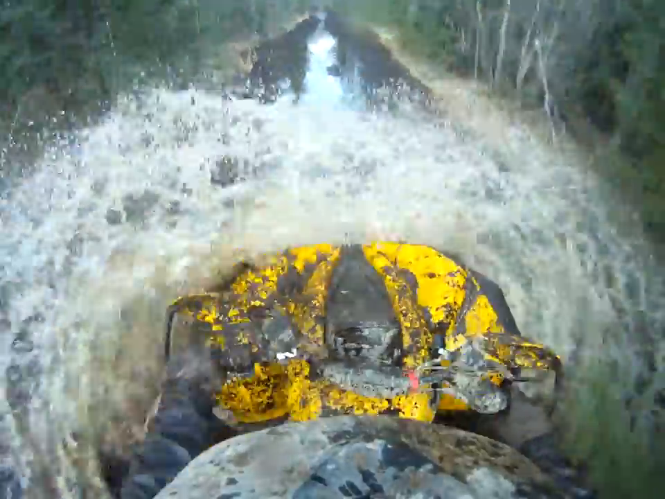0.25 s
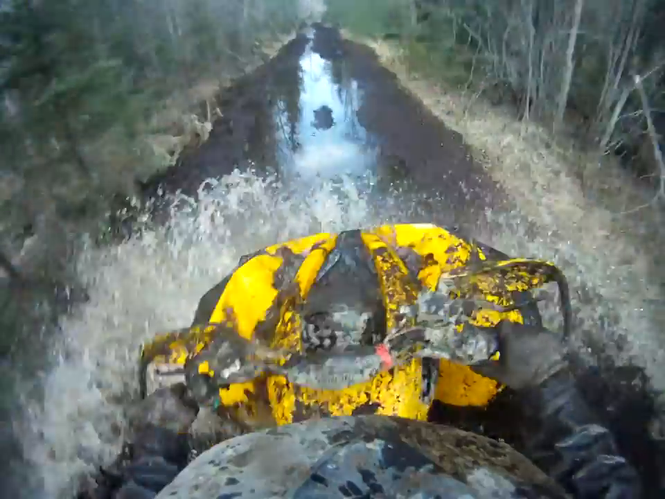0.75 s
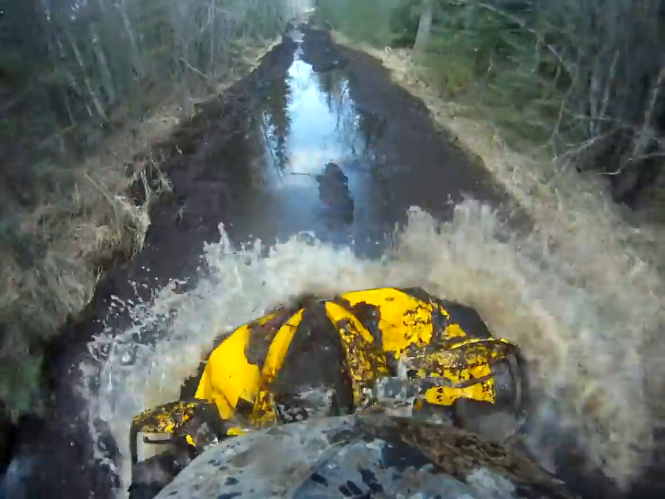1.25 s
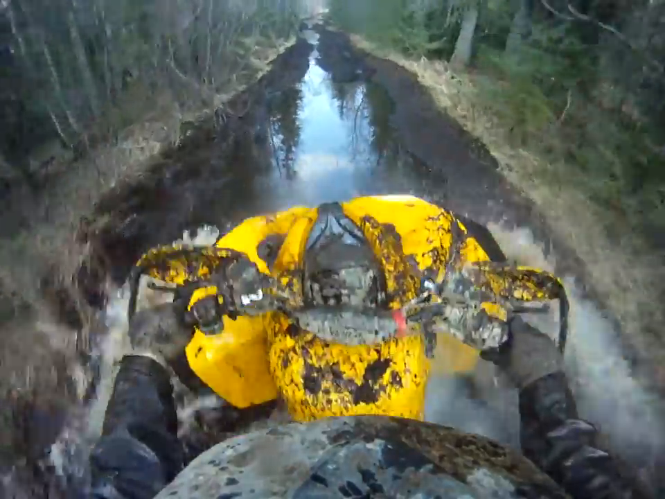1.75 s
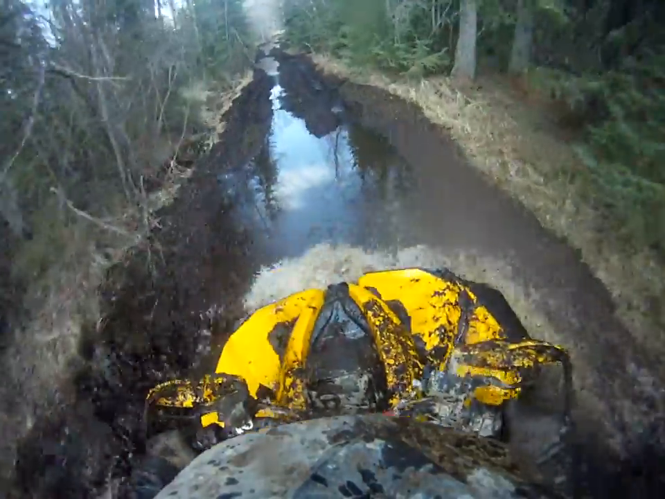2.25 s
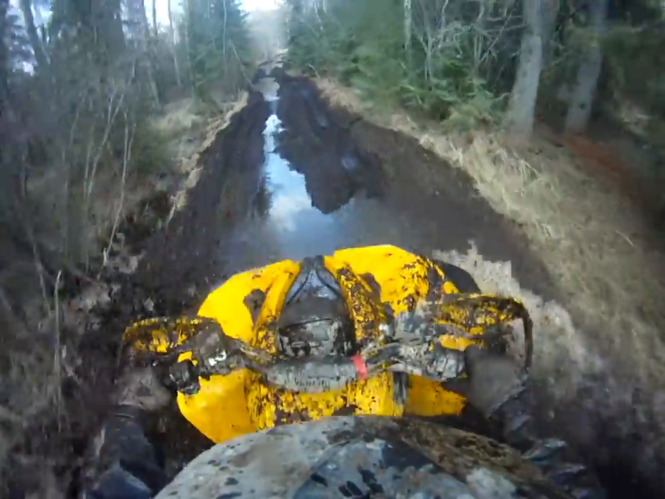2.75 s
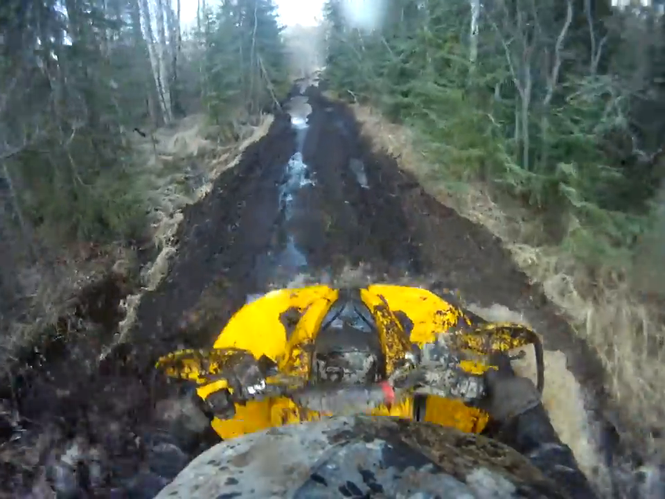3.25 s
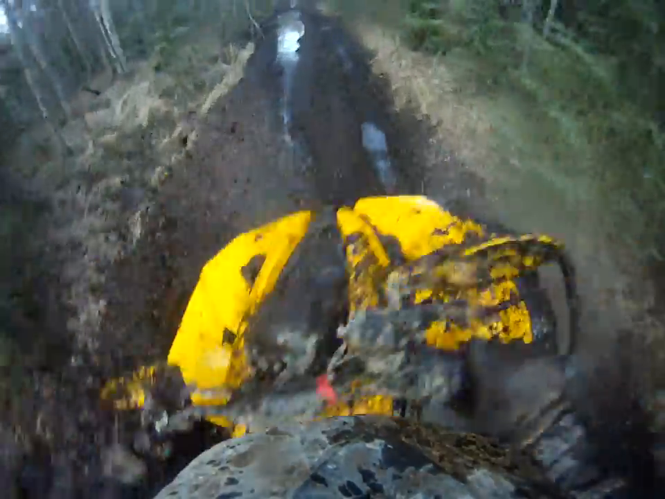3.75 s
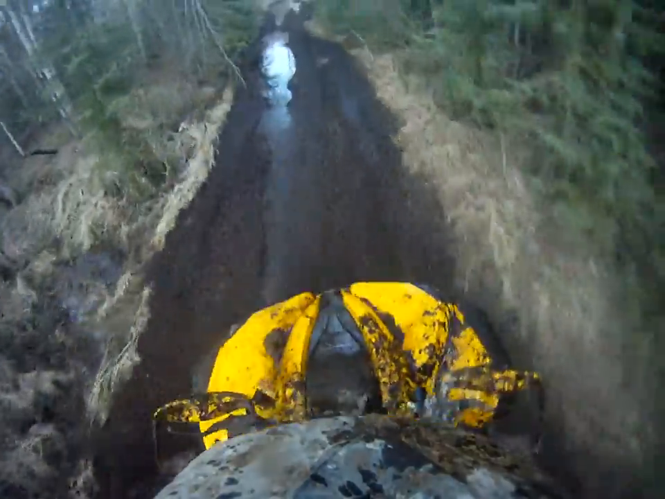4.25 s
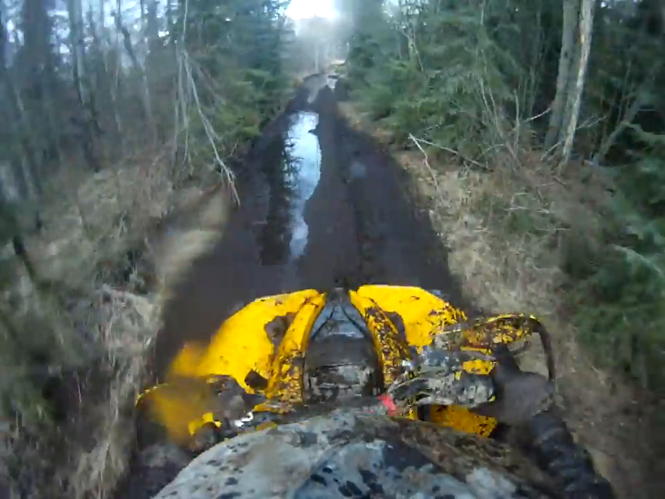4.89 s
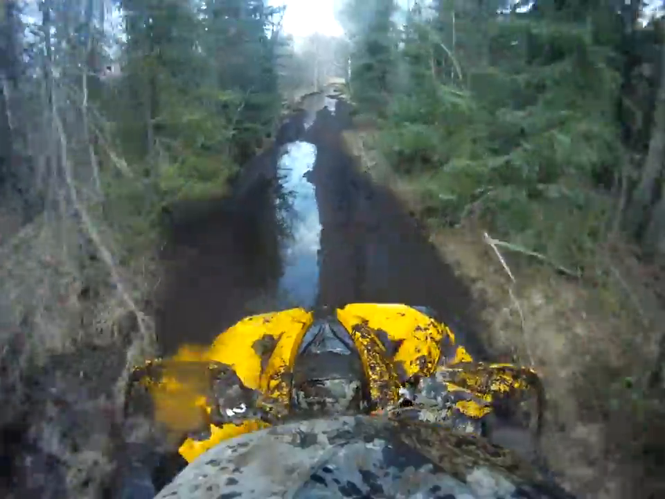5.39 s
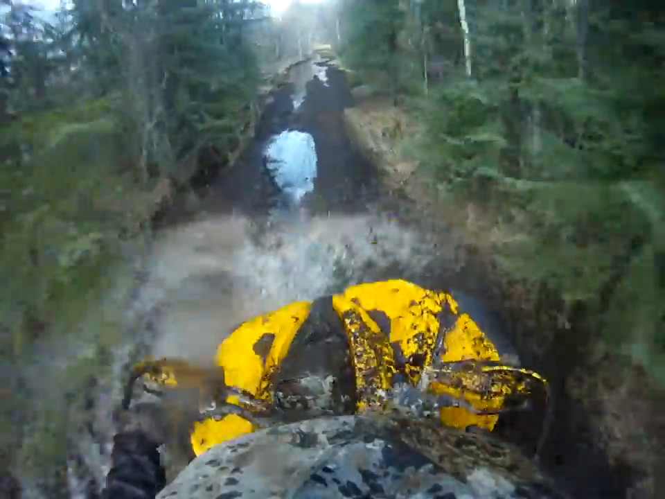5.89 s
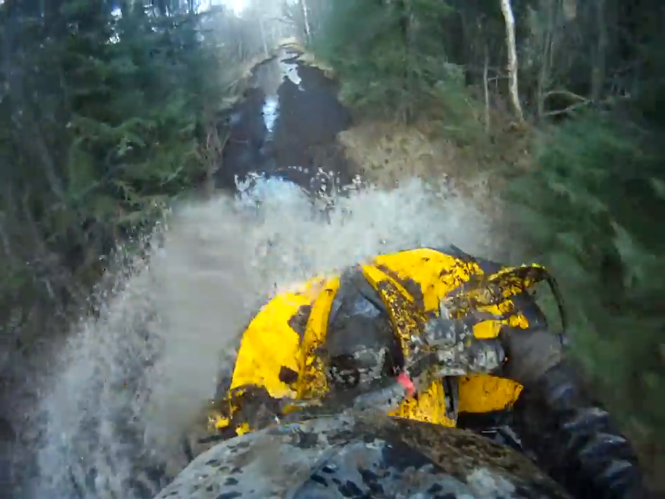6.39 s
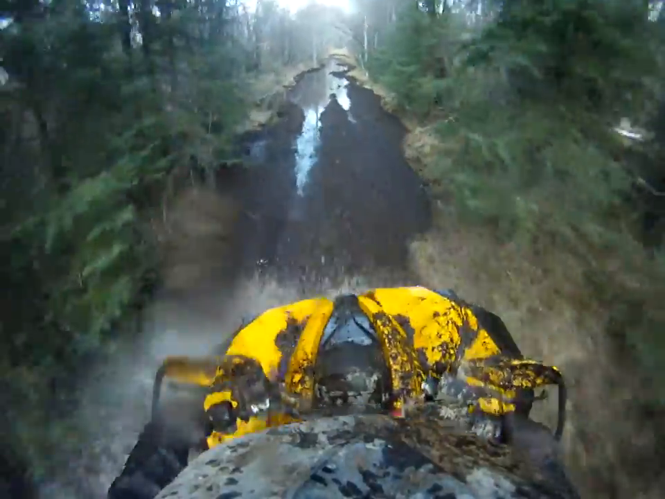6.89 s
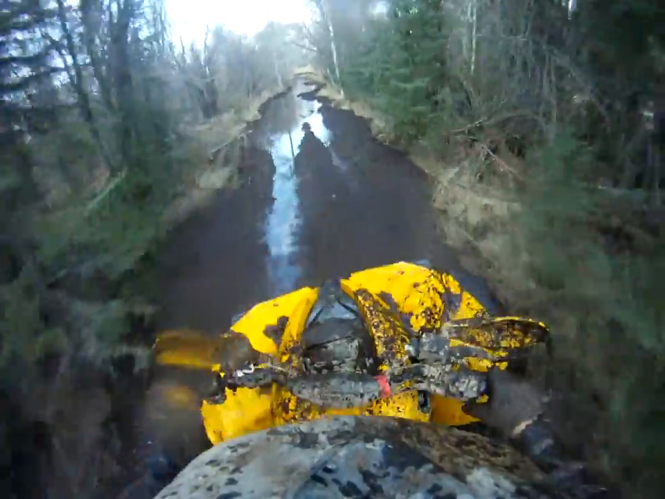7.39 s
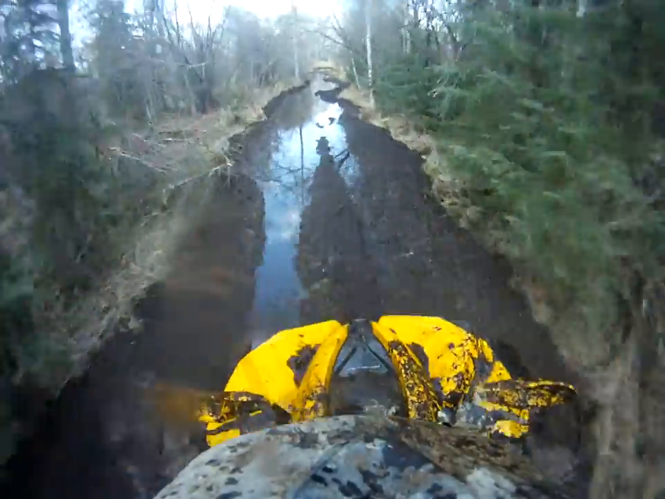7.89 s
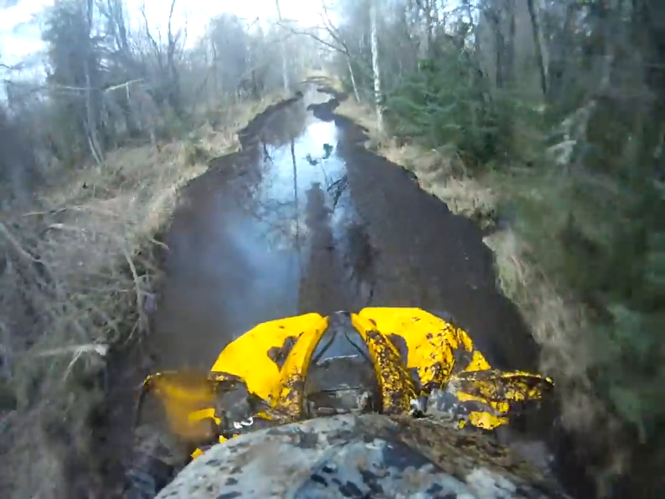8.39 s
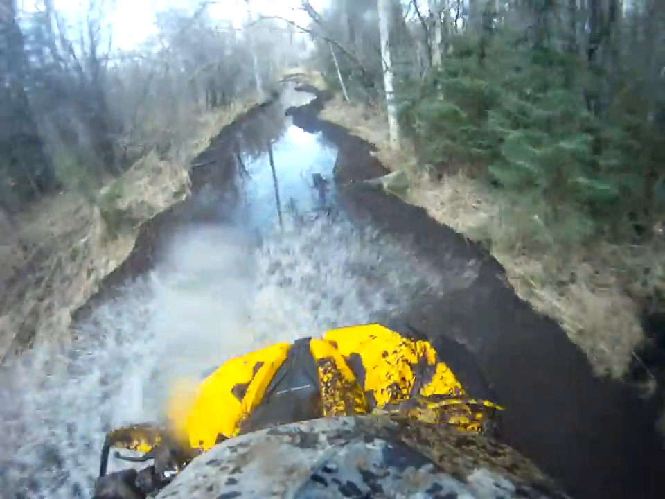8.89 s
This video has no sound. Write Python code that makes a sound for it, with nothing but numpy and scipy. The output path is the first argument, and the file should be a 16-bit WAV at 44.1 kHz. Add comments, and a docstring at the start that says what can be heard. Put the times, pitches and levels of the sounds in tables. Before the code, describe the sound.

Heard from the rider's helmet, slightly boxy, a quad bike engine surges and drops on a wet, muddy trail. Quick bursts of throttle bring a deep boom and an intake rasp over steady mechanical clatter and the hiss of tyre spray. Midway, sharp flicks of mud hit the bodywork among dull suspension knocks. The spray swells briefly through puddles, the engine revs again, then settles to a lighter throb.

```python
"""V-twin quad bike on a flooded forest trail, heard from a cased camera on the rider's helmet.
Throttle stabs surge the revs; the exhaust throbs, and booms when the firing rate nears pipe resonance.
The intake rasps under load, the drive clatters, the clutch rings as the revs fall.
Water sprays off the tyres, mud flicks the bodywork, the chassis thumps in ruts."""
import sys
import numpy as np
from scipy import signal
from scipy.fft import rfft, irfft, next_fast_len
from scipy.io import wavfile
from scipy.ndimage import uniform_filter1d, map_coordinates

SR = 44100
rng = np.random.default_rng(int(sys.argv[2]) if len(sys.argv) > 2 else 0)


def store_wav(level_fs):
    """Save 16-bit WAV to argv[1]."""
    pcm = np.round(np.clip(np.atleast_2d(level_fs), -1, 1) * 32767)
    wavfile.write(sys.argv[1], SR, pcm.T.astype(np.int16))


N = 403064

# Engine speed between stabs: t/s, four-stroke cycle rate/Hz
BASE_SPEED = [(0.1, 36.79), (0.31, 43.44), (0.57, 41.67), (0.8, 35.11), (0.95, 34.07), (1.24, 41.23),
              (1.32, 39.96), (1.51, 44.61), (2.09, 45.85), (2.6, 41.0), (2.76, 41.72), (3.26, 47.84),
              (4.06, 43.84), (4.18, 36.36), (4.79, 40.54), (4.85, 39.79), (5.58, 42.45), (5.66, 40.92),
              (6.22, 42.78), (6.35, 39.99), (6.67, 42.48), (6.87, 34.12), (7.12, 39.32), (7.67, 35.7),
              (8.09, 38.32), (8.84, 38.75), (9.14, 41.4)]
# Throttle stabs: t/s, length/s, cycle rate added if held/Hz, relative rasp level/dB, boom boost/dB
STABS = [(0.035, 0.24, 13.831, -26.5, 5), (0.437, 0.16, 14.3, -31.5, 5.5), (1.544, 0.17, 13.4, -29, 4.5),
         (1.863, 0.15, 18.5, -22.5, 2.5), (3.346, 0.34, 20, -18, 4.5), (6.46, 0.192, 6.66, -35.0, 2.0),
         (6.949, 0.147, 12.32, -32, 3), (7.225, 0.19, 29, -25.5, 4.5)]
# Engine load: t/s, load (0 coasting, 1 pulling hard)
ENGINE_LOAD = [(0, 0.27), (.6, 0.98), (1.0, 0.46), (1.35, 0.58), (1.6, 1), (2.5, 0.83), (3.3, 1),
               (4.3, 0.6), (5.2, 0.51), (6.5, 0.59), (7.2, 0.43), (7.55, 0.15), (8.85, 0.019), (9.14, 0.54)]
# Exhaust harmonics of the cycle rate: order, then relative level/dB at light throttle, cruise, pull, pickup
EXHAUST_ORDERS = [(1, -38, -17, -6, -24), (3, -46, -16, -4, -2), (4, -24, -9.5, 2.5, -5.5),
                  (5, -1.5, -0.5, 2.5, -5), (6, 2, -4, 3, -16), (7, 2.5, 1, -15.5, -2.5),
                  (8, -13.5, -1, -6.5, 4), (9, -10, -26, -10.5, -11.5), (10, -21.5, -18, -8.5, -7.5),
                  (11, -36, -23.5, -9, -10.5), (12, -27.5, -34, -37, -16.5), (13, -40, -11, -16, -7.5),
                  (14, -22.5, -19.5, -16.5, -15)]
# Exhaust note: t/s, relative level/dB
EXHAUST_LEVEL = [(0.0, -35.5), (0.1, -23.5), (0.73, -27), (0.89, -37.5), (1.04, -28), (1.91, -30),
                 (1.99, -26), (3.28, -34), (3.46, -25), (3.61, -23.5), (4.18, -31.5), (4.89, -28),
                 (5.17, -30.5), (6.51, -28.5), (6.62, -30), (7.07, -27.5), (7.13, -31.5), (7.28, -26.5),
                 (7.76, -27.5), (9.14, -27)]
# Tyre spray: t/s, relative level/dB
SPRAY_LEVEL = [(0.0, -46.5), (0.18, -44), (0.41, -46), (1.04, -44), (1.2, -46.5), (1.91, -47.5),
               (1.96, -43), (2.11, -48), (3.1, -46), (3.61, -41), (4.1, -47), (5.37, -48), (7.38, -46.5),
               (7.69, -50.5), (9.06, -52), (9.14, -45)]
# Puddles: t/s, length/s, spray boost/dB
PUDDLE_HITS = [(6.026, 0.22, 3), (6.557, 0.17, 2)]
# Mud on the bodywork, chassis bottoming in ruts: t/s, relative level/dB
MUD_HITS = [(0.782, -31), (4.343, -15.5), (4.994, -12.5), (4.997, -15)]
RUT_HITS = [(0.784, -20), (1.23, -24), (3.799, -29), (4.25, -23), (4.995, -21), (5.689, -24), (5.75, -29),
            (6.88, -23)]
# Source spectra: f/Hz, relative level/dB
INTAKE_SPECTRUM = [(150, -31), (400, -7.5), (750, 1), (1100, 4.5), (1700, -4.5), (2400, -7.5), (3500, -4.5),
                   (5500, -27)]
DRIVE_SPECTRUM = [(120, 7), (350, -6), (800, -1.5), (1200, 3), (1900, -3), (2800, 7), (5500, -3)]
SHEAVE_SPECTRUM = [(2600, -34), (3380, -11), (3580, -11), (3800, -14), (4500, -38)]
SPRAY_SPECTRUM = [(100, -4), (400, -8.5), (1200, -8.5), (2500, 5.5), (5500, 2)]
MUD_SPECTRUM = [(200, -28), (1200, 0), (3000, 7), (4200, 7), (5500, -7)]
TYRE_SPECTRUM = [(15, -27), (45, -13), (105, 6), (170, -19), (400, -12.5), (900, -60)]
# Camera case resonances: f/Hz, relative level/dB
CASE_RESPONSE = [(570, 0), (720, -11.5), (950, -11), (1160, -1), (1470, -5.5), (1620, 1.5), (2270, 0),
                 (2400, -6), (2900, -16.5), (3100, -12), (3380, -13.5), (3570, -4.5), (3950, -20.5),
                 (5100, -10.5)]

CYLINDER_LAG_CYCLES = 280 / 720
CRUISE_HZ, LUG_HZ = 41, 37.3  # cycle rates


def exhaust(cycle, speed_hz, rev_per_s, throttle, uneven):
    """Crank orders ring the silencer: one cylinder leads at light throttle, both bark under load."""
    # The note thins while the engine picks up from low revs.
    pickup = np.clip(rev_per_s / 0.72, 0, 1) * np.clip((49 - speed_hz) / 8.4, 0, 1)
    joins, full = 0.096, 0.36  # throttle range that brings in cylinder 2
    second = 0.91 * np.clip((throttle - joins) / (full - joins), 0, 1)
    sway_db = 0.6 + 2.6 * second  # orders swell and slip under shifting load
    easing, pulling = np.maximum(1 - 2 * throttle, 0), np.maximum(2 * throttle - 1, 0)
    note, power = np.zeros(N), np.zeros(N)
    for order, light_db, cruise_db, pull_db, pickup_db in EXHAUST_ORDERS:
        held_db = cruise_db + (light_db - cruise_db) * easing + (pull_db - cruise_db) * pulling
        gain = amp(held_db + (pickup_db - held_db) * pickup + sway_db * wobble(4))
        if order < 5:
            gain *= (speed_hz / 50) ** 3  # low orders pass the silencer only at high revs
        lag_rad = 2 * np.pi * order * CYLINDER_LAG_CYCLES
        pair_rad = np.arctan2(-second * np.sin(lag_rad), 1 + second * np.cos(lag_rad))
        silencer_rad = -2 * np.arctan((order * speed_hz - 255) / 110)
        phase = 2 * np.pi * order * cycle + pair_rad + silencer_rad + 0.98 * second * wobble(2)
        # Uneven burns smear each order into its neighbours.
        in_phase = 1 - uneven / 2 + 1.12 * uneven * wobble(42)
        quadrature = 0.55 * uneven * wobble(42)
        note += gain * (in_phase * np.cos(phase) + quadrature * np.sin(phase))
        power += gain ** 2 / 2
    return amp(curve(EXHAUST_LEVEL) + 0.5) * note / np.sqrt(power)


def pipe_boom(cycle, speed_hz, effort_db, uneven):
    """Two firings a cycle, varying in size, swell as their rate nears the pipe resonance."""
    pipe_hz, half_width_hz = 99.3, 8
    detuning = (2 * speed_hz - pipe_hz) / half_width_hz
    size = 1 + (0.017 + 0.5 * uneven) * wobble(80)
    pulses = size * np.cos(4 * np.pi * cycle + 0.28 * uneven * wobble(45))
    return amp(-30 + effort_db) * np.sqrt(2 / (1 + detuning ** 2)) * pulses


def intake(cycle, speed_hz, load):
    """Each gulp of air tears a rasp from the airbox; harder draw is more pitched."""
    rise_db_per_s, fall_db_per_s, onset_s = 50, 113, 0.069
    t = np.arange(N) / SR
    draw = amp(-42 + 15.5 * np.log2(speed_hz / CRUISE_HZ) + 7.5 * (load - 0.5))
    for start_s, length_s, _, rasp_db, _ in STABS:
        past_crest_s = t - start_s - 0.71 * length_s
        swell_db = np.minimum(rise_db_per_s * past_crest_s, -fall_db_per_s * past_crest_s)
        onset = np.clip((t - start_s) / onset_s, 0, 1)
        draw = np.hypot(draw, amp(rasp_db + swell_db) * onset)
    gulps = (1.8 + firings(cycle, decay_cycles=0.13, second=0.89)) * amp(1.6 * wobble(45))
    pitched = np.interp(20 * np.log10(draw), [-40, -24], [0.48, 0.89])
    rasp = coloured(gulps * crank_noise(cycle, pitched), INTAKE_SPECTRUM, CASE_RESPONSE)
    return amp(2) * draw * rasp


def drive(cycle, speed_hz):
    """Valves, gears and belt clatter, louder with speed."""
    beats = (1.9 + firings(cycle, decay_cycles=0.12, second=0.65)) * amp(1.1 * wobble(160))
    level_db = -35.9 + 17 * np.log10(speed_hz / CRUISE_HZ) + 0.8 * wobble(8.4)
    clatter = beats * crank_noise(cycle, repeating=0.26)
    return amp(level_db) * coloured(clatter, DRIVE_SPECTRUM, CASE_RESPONSE)


def clutch(speed_hz, rev_per_s):
    """Falling revs slide the belt down the sheaves, which ring louder at high speed."""
    sliding = np.clip(-rev_per_s, 0, 1)
    ring_db = -43.8 + 18 * np.log2(speed_hz / CRUISE_HZ)
    return amp(ring_db) * np.sqrt(sliding) * coloured(rng.standard_normal(N), SHEAVE_SPECTRUM)


def spray(opening):
    """Sheets of water and fine drops hiss off the tyres; puddles and wheelspin throw more."""
    drops_per_s, wheelspin_db = 1500, 1.5
    puddle_db = sum(db * swell(start_s, length_s, rise_s=0.078, fall_s=0.058)
                    for start_s, length_s, db in PUDDLE_HITS)
    drops = (rng.random(N) < drops_per_s / SR) * rng.standard_normal(N)
    water = unit(rng.standard_normal(N) + 0.43 * unit(drops)) * amp(0.71 * wobble(30))
    level_db = curve(SPRAY_LEVEL) + 12 + puddle_db + wheelspin_db * opening
    return amp(level_db) * coloured(water, SPRAY_SPECTRUM, CASE_RESPONSE)


def mud():
    """Clods hit the bodywork: sharp tick, short splatter."""
    hits, t = np.zeros(N), np.arange(SR // 20) / SR
    tick = np.sin(2 * np.pi * 2900 * t) * decay(t, t60_s=0.0025)
    splat_envelope = decay(t, t60_s=0.012) + 0.25 * decay(t, t60_s=0.026)
    for start_s, db in MUD_HITS:
        splat = splat_envelope * rng.standard_normal(len(t))
        hits[round(start_s * SR):][:len(t)] += amp(db - 6.5) * (tick + 1.12 * splat)
    return np.std(hits) * coloured(hits, MUD_SPECTRUM, CASE_RESPONSE)


def chassis():
    """Ruts knock the suspension; tyres rumble through mud."""
    knocks, t = np.zeros(N), np.arange(SR // 5) / SR
    thud = np.sin(2 * np.pi * 105 * t) * decay(t, t60_s=0.1)
    thud += 0.23 * np.sin(2 * np.pi * 42 * t) * decay(t, t60_s=0.16)
    for start_s, db in RUT_HITS:
        knocks[round(start_s * SR):][:len(t)] += amp(db) * thud
    rumble = amp(-44 + 3.4 * wobble(8)) * coloured(rng.standard_normal(N), TYRE_SPECTRUM)
    return knocks + rumble


def firings(cycle, decay_cycles, second):
    """One decaying puff per cylinder, unevenly spaced."""
    lagged = cycle - CYLINDER_LAG_CYCLES
    return np.exp(-(cycle % 1) / decay_cycles) + second * np.exp(-(lagged % 1) / decay_cycles)


def crank_noise(cycle, repeating, size=280):
    """Noise with a share of its power repeating each cycle in a slowly drifting pattern."""
    def pattern():
        grain = irfft(np.exp(2j * np.pi * rng.random(size // 2 + 1)), size)
        return unit(map_coordinates(grain, [cycle % 1 * size], mode="grid-wrap"))
    drift_rad = 1.4 * wobble(2.486)
    locked = np.cos(drift_rad) * pattern() + np.sin(drift_rad) * pattern()
    fresh = signal.resample_poly(rng.standard_normal(N // 3 + 1), 3, 1)[:N]
    return np.sqrt(repeating) * locked + np.sqrt(1 - repeating) * unit(fresh)


def amp(db):
    """dB to gain."""
    return 10 ** (np.asarray(db) / 20)


def unit(x):
    """Scale to rms 1."""
    return x / np.sqrt(np.mean(x ** 2) + 1e-20)


def decay(t, t60_s):
    """Fall of 60 dB per t60_s."""
    return amp(-60 * t / t60_s)


def swell(start_s, length_s, rise_s, fall_s):
    """Rise toward 1 for length_s, then die away."""
    t = np.arange(N) / SR - start_s
    rise = 1 - np.exp(-np.clip(t, 0, length_s) / rise_s)
    return rise * np.exp(-np.clip((t - length_s) / fall_s, 0, 20))


def curve(rows):
    """(t/s, value) rows to one value per sample."""
    return np.interp(np.arange(N) / SR, *np.transpose(rows))


def wobble(rate_hz):
    """Smooth random curve with knots at rate_hz."""
    knots = rng.standard_normal(int(N * rate_hz / SR) + 4)
    coarse = map_coordinates(knots, [np.arange(0, N, 32) * rate_hz / SR])
    return np.interp(np.arange(N), np.linspace(0, N, len(coarse)), coarse)


def filtered(x, response):
    """Apply the gain response(hz) by FFT."""
    size = next_fast_len(N + SR // 4, real=True)
    return irfft(rfft(x, size) * response(np.fft.rfftfreq(size, 1 / SR)), size)[:N]


def coloured(x, *spectra, cutoff_hz=5680):
    """x through (f/Hz, level/dB) spectra and the camera's low-pass, at rms 1."""
    def response(hz):
        db = sum(np.interp(np.log(hz + 1), np.log(knots_hz), knots_db)
                 for knots_hz, knots_db in map(np.transpose, spectra))
        return amp(db) / (1 + (hz / cutoff_hz) ** 28)
    return unit(filtered(x, response))


def scene():
    """Stabs spin the engine up; crank angle times exhaust, intake and drive. Trail sounds on top."""
    load = np.clip(curve(ENGINE_LOAD), 0, 1)
    surge_hz = sum(added_hz * swell(start_s, length_s, rise_s=0.332, fall_s=0.16)  # inertia
                   for start_s, length_s, added_hz, _, _ in STABS)
    speed_hz = curve(BASE_SPEED) + surge_hz
    presses = np.array([swell(start_s, length_s, rise_s=0.022, fall_s=0.011)  # throttle plate
                        for start_s, length_s, *_ in STABS])
    opening = presses.sum(axis=0)
    stab_db = np.array(STABS)[:, -1] @ presses
    throttle = np.clip(load + 0.21 * opening, 0, 1)
    rev_per_s = uniform_filter1d(np.gradient(np.log(speed_hz)) * SR, SR // 6)  # relative speed change
    slowing = np.clip(-rev_per_s, 0, 1)
    lugging = np.clip((LUG_HZ - speed_hz) / 3, 0, 1)
    uneven = np.clip(0.12 * throttle + 0.31 * slowing + 0.36 * lugging, 0, 1)  # combustion roughness
    effort_db = 7.5 * load + stab_db + 2 * lugging + 0.5 * np.tanh(rev_per_s / 0.39)
    wander = 1 + 0.004 * wobble(7) + 0.001964 * wobble(25)  # rutted ground unsettles the speed
    cycle = np.cumsum(speed_hz * wander) / SR
    pipe = exhaust(cycle, speed_hz, rev_per_s, throttle, uneven)
    pipe += pipe_boom(cycle, speed_hz, effort_db, uneven)
    machinery = intake(cycle, speed_hz, load) + drive(cycle, speed_hz) + clutch(speed_hz, rev_per_s)
    return (pipe + machinery + spray(opening) + mud() + chassis())[None]


def record(dry):
    """The camera rounds peaks; its low-rate sample hold mirrors the sound into gritty treble."""
    ceiling, hold_hz, top_hz = 0.5, 12000, 15350
    rounded = dry[0] / (1 + (dry[0] / ceiling) ** 4) ** 0.25
    mirrored = rounded * (1 + 2 * np.cos(2 * np.pi * hold_hz * np.arange(N) / SR))
    return filtered(mirrored, lambda hz: np.sinc(hz / hold_hz) * (hz < top_hz))[None]


dry = scene()
out = record(dry)
store_wav(out)
```